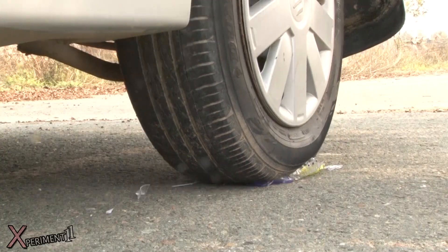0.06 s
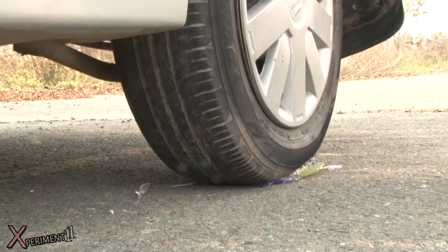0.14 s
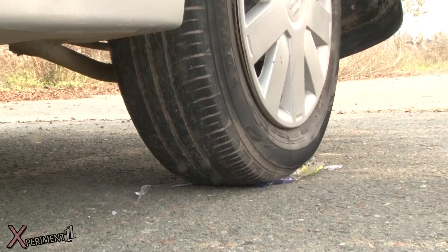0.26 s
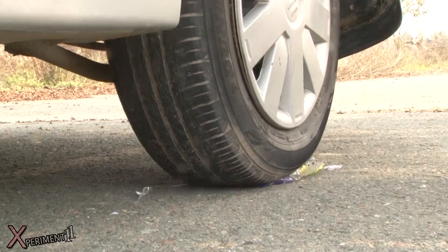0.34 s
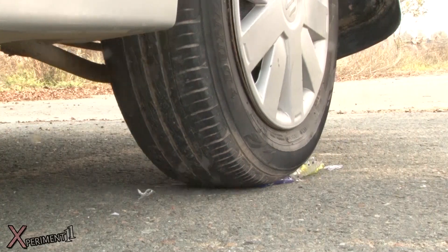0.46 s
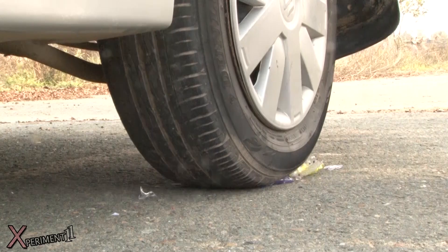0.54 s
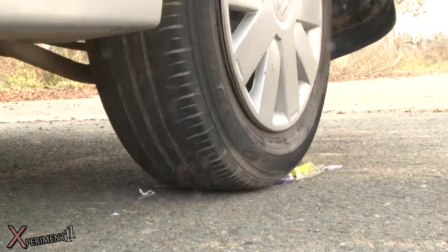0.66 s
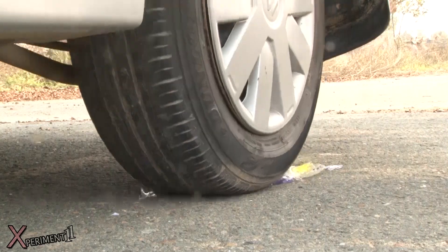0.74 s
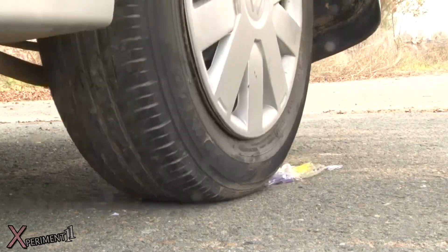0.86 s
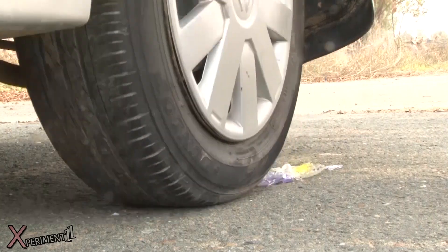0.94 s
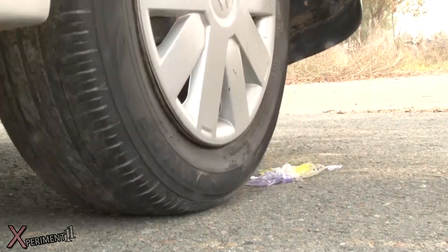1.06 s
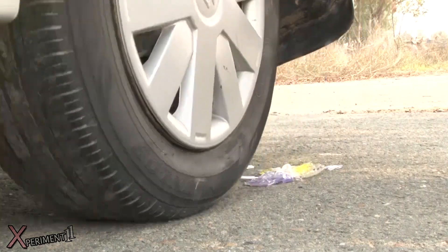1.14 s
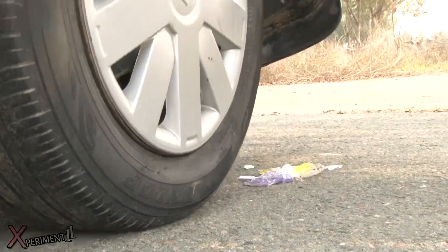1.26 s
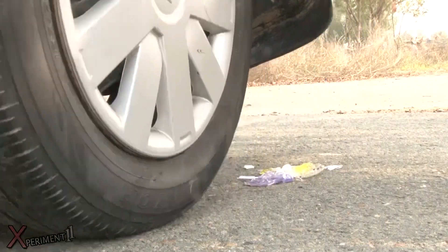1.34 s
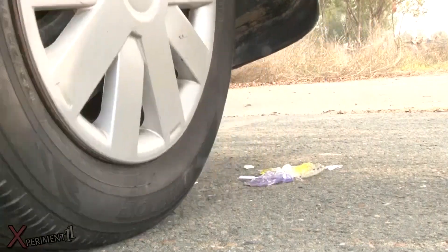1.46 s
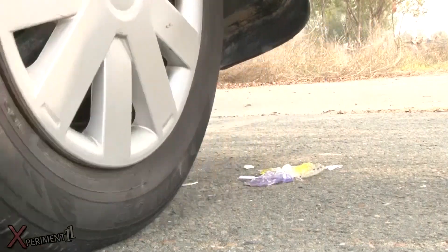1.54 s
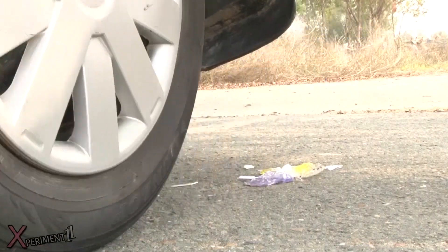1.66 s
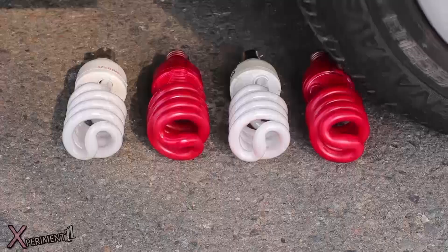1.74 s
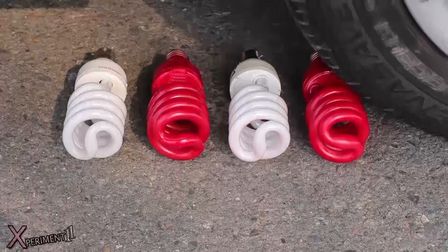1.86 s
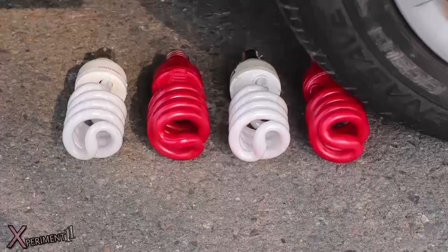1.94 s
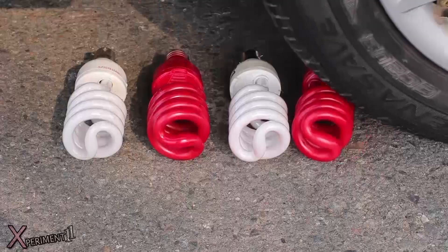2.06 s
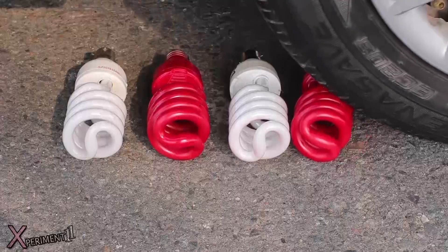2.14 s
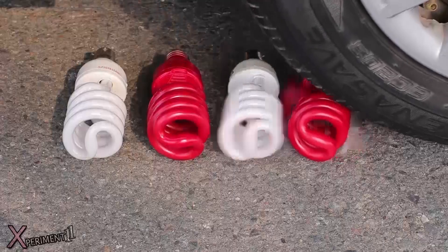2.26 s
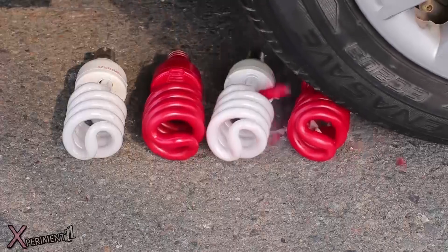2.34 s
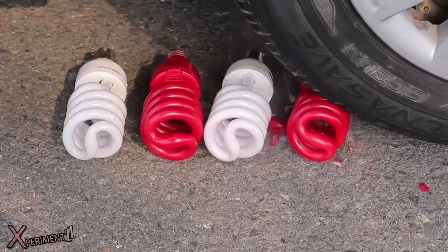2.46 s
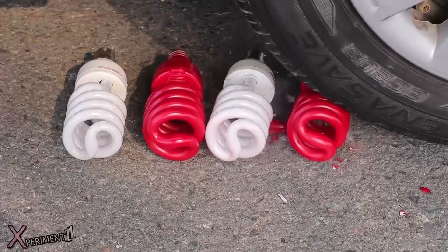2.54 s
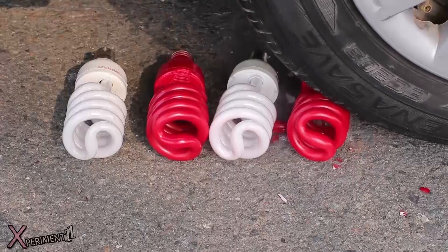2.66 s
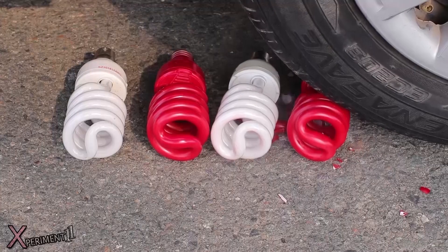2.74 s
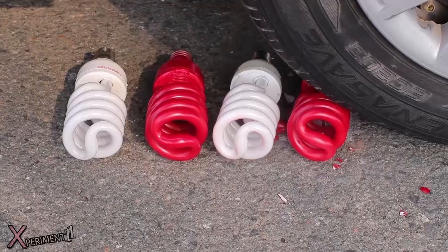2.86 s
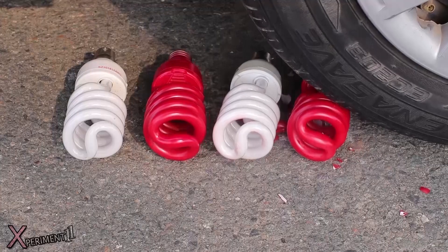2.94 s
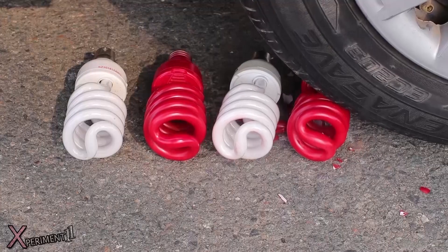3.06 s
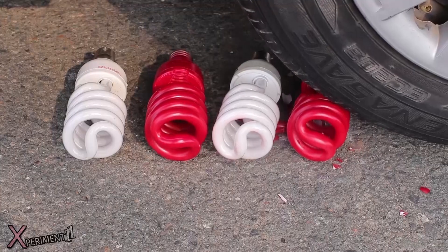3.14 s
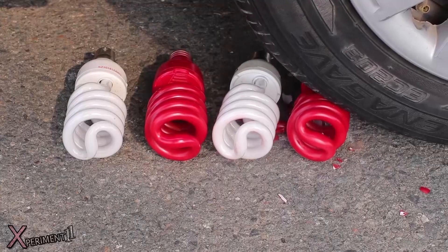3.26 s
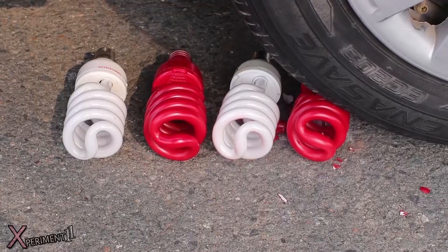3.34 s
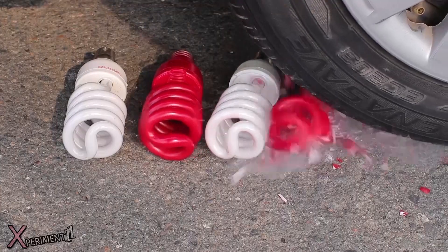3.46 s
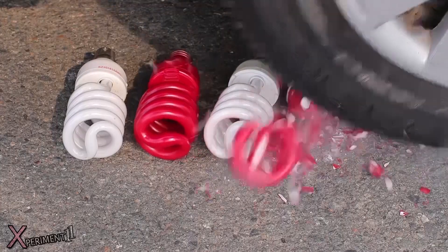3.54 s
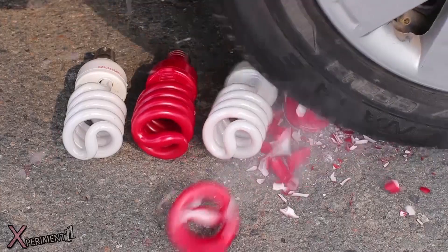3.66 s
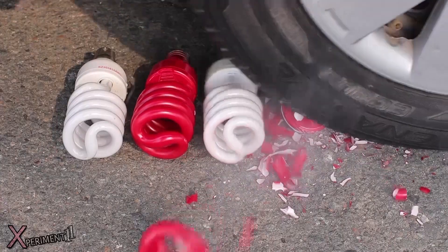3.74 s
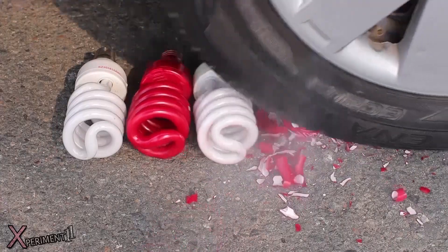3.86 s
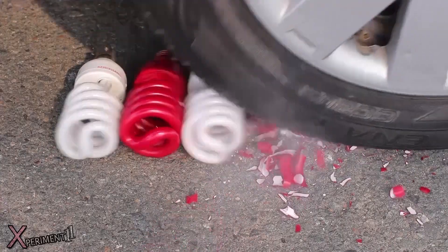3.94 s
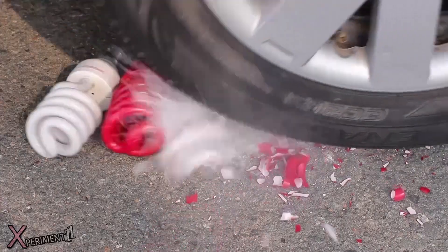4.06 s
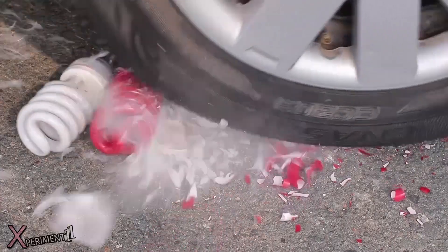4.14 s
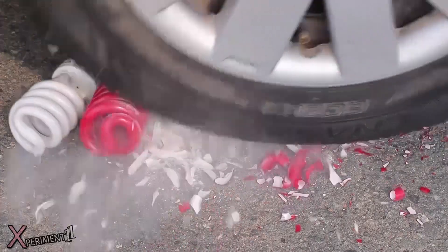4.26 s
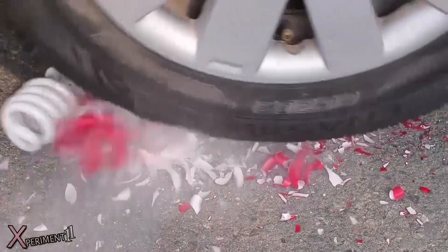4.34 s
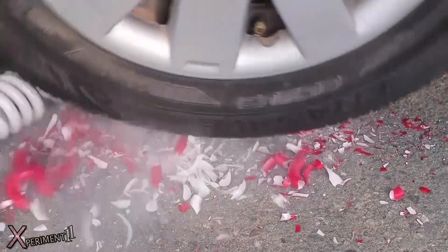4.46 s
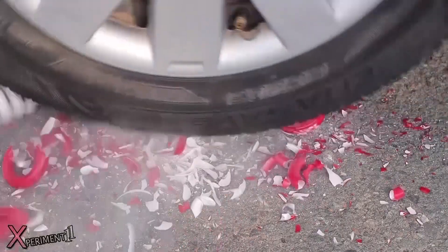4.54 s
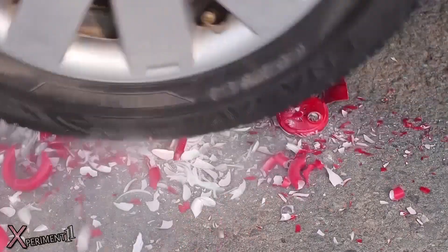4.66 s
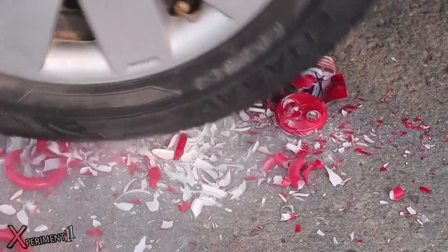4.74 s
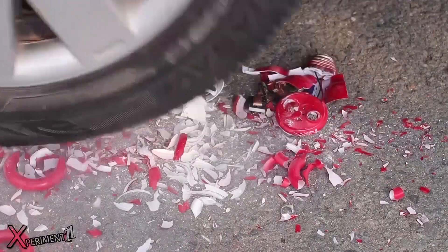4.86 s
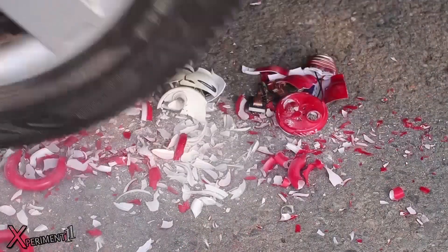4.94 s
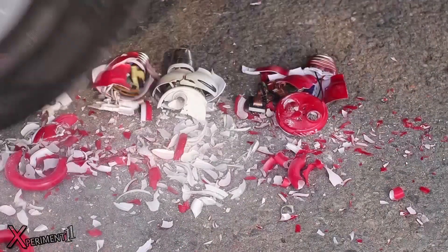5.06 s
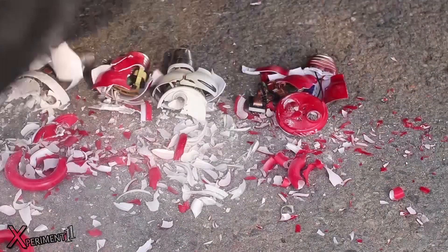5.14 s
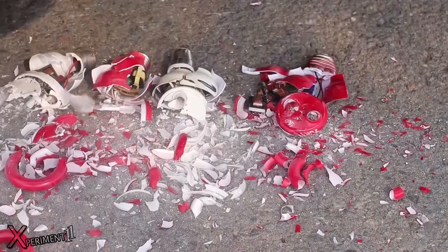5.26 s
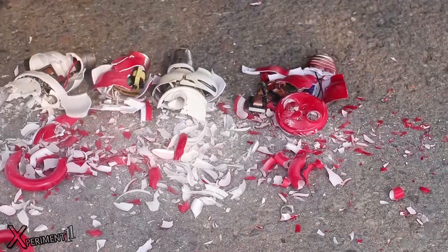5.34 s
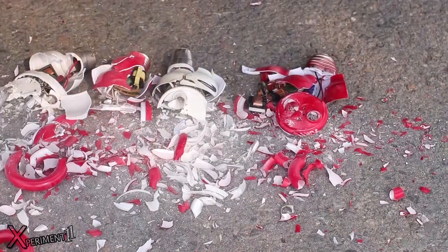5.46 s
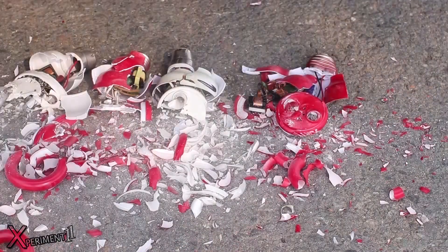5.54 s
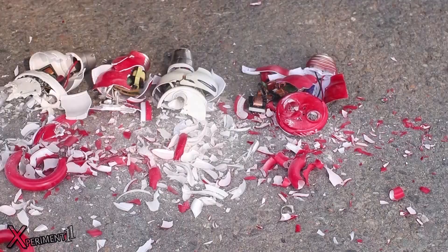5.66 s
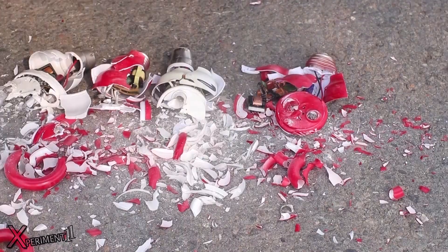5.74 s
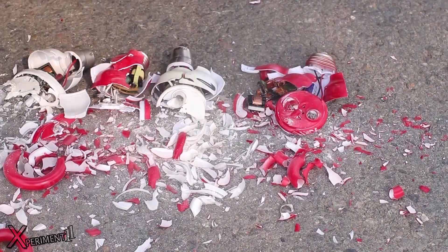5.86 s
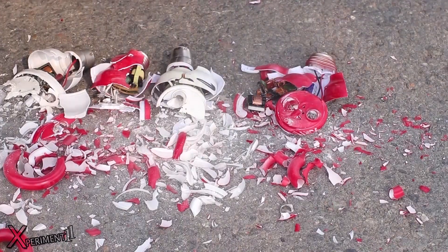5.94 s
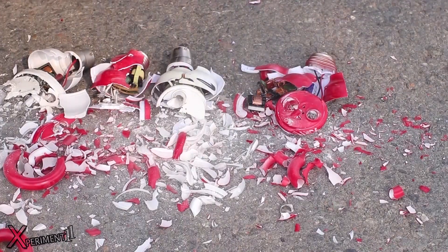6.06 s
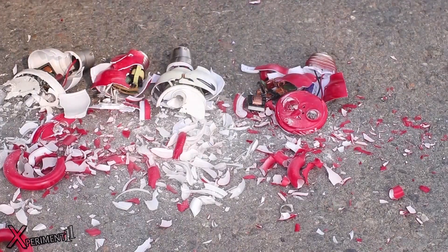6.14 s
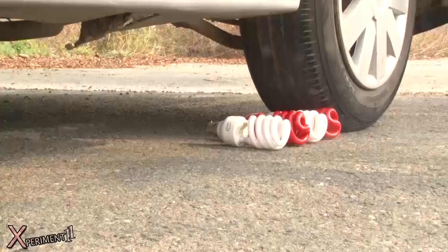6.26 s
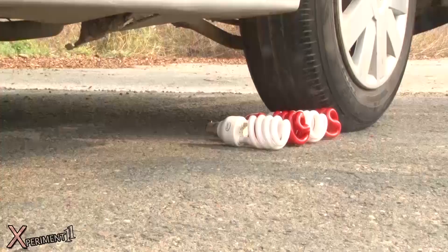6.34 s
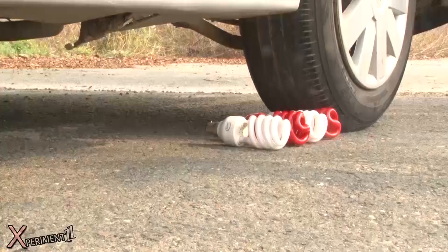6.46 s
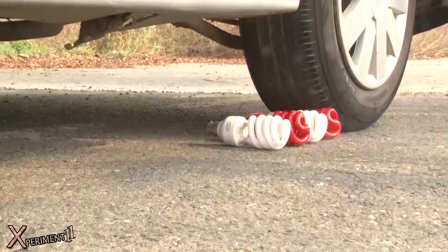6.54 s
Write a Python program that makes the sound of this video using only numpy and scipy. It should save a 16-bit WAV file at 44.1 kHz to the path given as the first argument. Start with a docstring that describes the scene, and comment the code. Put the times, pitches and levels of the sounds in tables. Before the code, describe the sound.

From 0 to 0.76 s everything sounds slowed and muffled: deep, dull glass cracks and a low thump over soft rumble. Sound then opens up: small dry snaps, ticks and bright tinkles from about 0.8 to 1.3 s, strongest near 1.05-1.1, over engine noise and low firing throb, thinning to engine alone by 1.8. Closer, a faint idle continues until one hard, loud pop at 2.36 s, with skittering shards. Engine idles quietly until 3.5 s, when lamps burst in rapid irregular succession, very loud, hollow and gritty, distorting the near microphone, each crack repeated milliseconds later by a farther one. Peaks run to about 4.65; splinters crunch and shards ring brightly. From 4.8 to 5.4 s breakage becomes duller, plasticky and weaker, with a last tick near 5.43. Faint idle remains, then at 6.3 s a louder, dull, slowed engine rumble closes.

```python
"""Glass cracks and tinkles, dull and deep at first as if slowed down, then bright and close: a tyre crushes lamps.
Each crack is a snap and a gritty noise burst that rings the hollow lamp parts; shards skid and ring
in damped sines; splinters crunch as dense clicks. An engine idles below as shaped noise, a hum and firing sines.
Up close a hot near microphone, which overloads, switches in over a farther one that hears cracks later.
The closing shot, slowed down too, is left to dull low engine noise."""
import sys
import numpy as np
from scipy import signal
from scipy.fft import rfft, irfft, next_fast_len
from scipy.io import wavfile

SR = 44100
rng = np.random.default_rng(int(sys.argv[2]) if len(sys.argv) > 2 else 0)


def file_out(sig):
    """Save sig as 16-bit WAV at sys.argv[1]."""
    # one column per channel
    cols = np.atleast_2d(sig).T
    # limit, then scale
    lim = np.clip(cols, -1, 1)
    pcm = np.round(lim * 32767).astype(np.int16)
    wavfile.write(sys.argv[1], SR, pcm)


N = 290802

# Cracks of the glass: t/s, relative treble peak level/dB, relative body level over treble/dB
CRACKS = [(0.0205, -20, -12.5), (0.177, -7.5, -26.5), (0.2728, -14, 3), (0.413, -28.5, -25),
          (0.625, -26.5, -5), (0.7845, -22.5, -21), (0.82, -14.5, -36), (0.843, -9.5, -45),
          (0.8638, -21.5, -5.5), (0.9521, -21.5, -21), (0.968, -23, -10.5), (1.046, -8.5, -20),
          (1.09, -23, -35), (1.106, -5.5, -10.5), (1.281, -30, -18), (1.3273, -26, -33), (2.359, 1, -3.5),
          (3.524, -0.5, -9), (3.6302, 2, -7.5), (3.768, 0, -13), (3.8614, -12, -40), (3.9336, 0.5, -8.5),
          (4.0038, -21, -16.5), (4.03, -7, -7), (4.0672, -2, -8), (4.136, -10.5, -20.5), (4.156, -1.5, -5),
          (4.224, -5, -10.5), (4.283, -8.5, -6.5), (4.3104, -12, -11), (4.3205, -6, -7.5),
          (4.352, -2.5, -6), (4.4391, 0.5, 4.5), (4.478, -21, -29), (4.5423, -1.5, -8.5),
          (4.5724, -9.5, -3), (4.6488, 2.5, -6), (4.6888, -6.5, 3), (4.7085, -12, -12), (4.7177, -13, 2.5),
          (4.8137, -18, 4), (4.8755, -6.5, 4), (4.915, -29.5, 16.5), (4.974, -16, -10), (5.014, -7, -3),
          (5.058, -15, -0.5), (5.0678, -10, 1.5), (5.0814, -7.5, -18), (5.117, -16, -5),
          (5.1732, -15, -2.5), (5.228, -13, -29), (5.2852, -10.5, -9), (5.4302, -9, -52)]
# Spans with the near microphone switched in: from t/s, to t/s
NEAR_SPANS = [(2.325, 2.487), (3.445, 5.53)]
# Fracture noise spectrum: f/Hz, relative density level/dB
FRACTURE_SPECTRUM = [(250, -28), (710, -18), (1200, -7), (4800, -7.5), (7330, -4.5), (16000, -17)]
# Hollow lamp base and tubes at pitch ratio 1: f/Hz, relative level/dB, t60/s
HOLLOW_MODES = [(280, -22, 0.049), (530, -1.5, 0.018), (773, 17, 0.0084), (1218, 18.5, 0.0081)]
# Treble of the breaking material, lower late on as duller plastic bases break: t/s, level/dB
TREBLE_OF_BREAKAGE = [(1.0, -3), (2.36, -6), (4.8, -2), (5.2, -13)]
# Ringing shards: t60/s at 5 kHz, modes (f/Hz, relative level/dB), touches on the road (t/s, relative level/dB)
SHARDS = [ (0.15, [(800, -9), (1480, 2.5), (1560, 0), (2030, -4), (2520, -5), (3520, -20.5)],
          [(.181, -26.5), (.195, -33), (.22, -33), (.735, -53)]), (0.087, [(3200, -9), (4330, -7),
          (5820, -1), (7000, -8), (8350, -6), (10300, 1.5)], [(.786, -28.5), (.798, -21.5)]),
          (0.087, [(5820, -9), (7250, -0.5), (9600, -2), (10300, 3)], [(.865, -30.5), (.987, -22.5),
          (1.163, -36)]), (0.094, [(5179, -14), (5780, -8), (7375, 0.5), (8468, -1), (9345, -16),
          (12200, -11)], [(1.326, -28), (1.373, -38), (1.518, -42)]), (0.19, [(2789, -16.5), (4940, -8),
          (7208, -1.5), (9625, -7), (10960, -14), (11460, -10), (14170, -17)], [(2.392, -25.5), (2.41, -22),
          (2.452, -28), (2.548, -44)]), (0.33, [(1490, -9), (2336, -2), (2541, -8), (3198, 0), (3716, 4),
          (5395, -4), (5900, -2), (8555, -5), (8865, -4), (9985, -2), (12050, -7)], [(3.544, -25),
          (3.675, -32), (3.72, -28.5), (3.751, -28)]), (0.34, [(7222, -0.5), (9306, -7.5), (12040, -20)],
          [(4.16, -16), (4.61, -24.5), (4.655, -21), (4.72, -31), (4.788, -24), (4.94, -38)]),
          (0.38, [(2110, -8), (3300, -11.5), (4360, -5.5), (4560, -3.5)], [(4.195, -38.5), (4.51, -42),
          (4.61, -33.5), (4.72, -26), (4.757, -26), (4.94, -31), (5.09, -32)]), (0.4, [(9050, -4),
          (10350, -4), (11500, -7.5), (13600, -5.5)], [(4.445, -31), (4.87, -38), (4.957, -38),
          (5.15, -34)]), ]
# Splinters under the tyre, one list per stretch: t/s, relative level/dB
CRUNCH_LEVELS = [
    [(.13, -49), (.2, -29), (.3, -45), (.45, -46), (.7, -86), (1.0, -38.5), (1.25, -53.5), (1.55, -75)],
    [(2.33, -31.5), (2.6, -56.5)],
    [(3.45, -57), (3.69, -43), (4.05, -30), (4.62, -36), (4.72, -31), (4.93, -29), (5.08, -22.5),
     (5.3, -37), (5.55, -55)],
]
# Engine noise in each shot. Levels: t/s, level/dB. Spectra: f/Hz, relative density level/dB
SLOW_START_LEVEL = [(0, -37.5), (.762, -33.5)]
SLOW_START_SPECTRUM = [(20, 3.5), (59, -6), (300, -7), (1000, -21), (2010, -22.5), (3700, -42.5),
                       (4300, -56), (5000, -110)]
SIDE_LEVEL = [(.764, -39), (1.8, -36.5)]
SIDE_SPECTRUM = [(20, -19), (100, -6), (377, -13.5), (1600, -18), (2670, -26.5), (7000, -34), (12400, -39),
                 (16000, -52)]
CLOSE_LEVEL = [(1.805, -40.5), (3.2, -43), (5.55, -47.5), (6.32, -48)]
CLOSE_SPECTRUM = [(20, -6.5), (45, -16.5), (210, -7.5), (330, -18), (620, -16.5), (1060, -19),
                  (1600, -11.5), (2000, -21.5), (3500, -27), (3850, -33), (6900, -30), (16000, -60)]
NEAR_ENGINE_LEVEL = [(2.33, -24.5), (2.49, -43.5), (3.45, -25), (3.52, -25.5), (3.6, -38.5), (4.4, -32),
                     (4.8, -37), (5.0, -57), (5.53, -49)]
NEAR_ENGINE_SPECTRUM = [(20, -8), (200, 1), (485, -12.5), (1190, -11), (2750, -23.5), (16000, -37.5)]
SLOW_END_LEVEL = [(6.325, -26), (6.59, -26)]
SLOW_END_SPECTRUM = [(20, -2.5), (223, -12), (636, -26), (2060, -36.5), (2650, -46), (2950, -94)]
# Engine bay resonances: f/Hz, width f/Hz, boost level/dB
ENGINE_BAY = [(877, 75, 12.5), (1730, 15, 12), (2273, 87, 10.5), (3200, 440, 8), (4430, 580, 12)]
# Steady engine hum: t/s, level/dB
HUM_LEVEL = [(.77, -49.5), (1.8, -39), (1.81, -56), (4.6, -44.5), (4.75, -30.5), (5.54, -52), (6.32, -51.5)]
# Engine firing: t/s, firing rate f/Hz, level/dB before the order levels
FIRING = [(.77, 39.8, -26.5), (1.3, 29.23, -46), (1.8, 28.94, -33), (1.81, 41.3, -42), (3.44, 39.1, -45.5),
          (3.6, 36.6, -38), (5.5, 29.7, -55), (6.32, 27, -41.5)]
# Multiples 1, 2, 3 of the firing rate: relative level/dB
FIRING_ORDERS_DB = [-4.5, -15.5, -11.5]
# Left-right likeness of noise: f/Hz, likeness (1 = same on both sides)
LIKENESS = [(60, 0.9), (400, 0.42), (2500, 0.43), (7000, 0.58), (14000, 0.17)]

CRACK_T60_S, TICK_T60_S = 0.095, 0.04
TICK_BELOW_DB = -30   # cracks with less body than this are mere ticks
CRACK_SPREAD_DB = 1.6   # cracks fall left and right of the microphones
SLOWED_PITCH_RATIO = 0.34   # hollow parts in the slowed first shot
SIZE_SPREAD_OCTAVES = 0.2   # hollow parts elsewhere differ in size
FAR_DB = -4.5   # far microphone against the near one
FAR_LOSS_PER_BODY_DB = 0.367   # cracks with much body are under the rubber, hidden from the far microphone
FAR_T60_SHARE = 0.45
FAR_LAG_S = 0.018
# Once the wheel rolls away, the far lag grows and the far level drops
ROLLS_FROM_S, LAG_GROWTH_S_PER_S, FAR_FADE_DB_PER_S = 4.5, 0.0026, 3
SKID_T60_S = 0.051   # a touch is a short rough skid
# Chips fly with a shard: fainter, shorter modes, struck unevenly
CHIP_DB, CHIP_SPREAD_DB, CHIP_T60_SHARE = -16, 8, 0.56
SPLINTERS_PER_S = 800   # on average
HUM_HZ = 249.4
SLOW_STOP_HZ, TOP_STOP_HZ = 4370, 16300   # low-pass stopband edges


def cracks(rows, snap_db, body_db):
    """Each crack is a snap and a dying, gritty burst of fracture noise, which also rings the hollow parts."""
    size = SR // 5
    t = np.arange(size) / SR
    out = np.zeros((2, N + SR))
    hiss = glassy(noise(FRACTURE_SPECTRUM))
    click = ring(t == 0, 2080, 0.0023)   # the first give of the wall
    shakes = rng.standard_normal((len(rows), size))
    steps = rng.standard_normal((len(rows), 150))   # the fracture runs on in jerks of a millisecond or so
    sides = amp(CRACK_SPREAD_DB * rng.standard_normal((len(rows), 1, 1)) * [[1], [-1]])
    for (s, peak_db, rel_db, t60, pitch), shake, jerks, side in zip(rows, shakes, steps, sides):
        jerk_curve = np.interp(t * 700, np.arange(150), jerks)
        grit = amp(3.3 * np.maximum(jerk_curve, 1 - t * 500))   # the first jerk is never weak
        snap = amp(snap_db - 60 * t / 0.0066)
        burst = amp(-60 * t / t60) * grit + snap
        body = hollow(shake * burst, pitch)
        body = body / np.max(np.abs(body)) * amp(rel_db + body_db)
        body = body * amp([[-.7], [.7]])   # slightly louder on the right
        i = round(s * SR)
        fracture = amp(-7.0) * hiss[:, i:i + size] * burst
        out[:, i:i + size] += side * amp(peak_db) * (fracture + amp(-2.0) * click + body)
    return out[:, :N]


def crack_rows():
    """Cracks with what they ring: t/s, peak level/dB, body level/dB, t60/s, pitch ratio."""
    s, peak_db, rel_db = np.transpose(CRACKS)
    slowed = s < SLOW_START_LEVEL[-1][0]
    short = (rel_db < TICK_BELOW_DB) | (slowed & (rel_db > 0))   # slowed thumps are single blows
    t60 = np.where(short, TICK_T60_S, CRACK_T60_S)
    sizes = 2 ** rng.normal(0, SIZE_SPREAD_OCTAVES, len(s))
    pitch = np.where(slowed, SLOWED_PITCH_RATIO, sizes)
    return np.column_stack([s, peak_db, rel_db, t60, pitch])


def heard_twice():
    """Mark the cracks of the close shot, which has two microphones."""
    return np.array(CRACKS)[:, 0] > CLOSE_LEVEL[0][0]


def near_microphone(rows):
    """Loud cracks flatten softly toward the overload point; heard only while switched in."""
    t = np.arange(N) / SR
    on = sum((t > a) & (t < b) for a, b in NEAR_SPANS)
    x = cracks(rows, snap_db=-2.0, body_db=1.5) + engine(NEAR_ENGINE_LEVEL, NEAR_ENGINE_SPECTRUM)
    top = 0.5
    return on * x / (1 + np.abs(x / top) ** 4) ** (1 / 4)


def far_microphone(rows):
    """The cracks arrive later, shorter and with more body."""
    s, peak_db, rel_db, t60, pitch = rows.T
    rolling_s = np.maximum(s - ROLLS_FROM_S, 0)
    late = s + FAR_LAG_S + LAG_GROWTH_S_PER_S * rolling_s
    hidden_db = FAR_LOSS_PER_BODY_DB * np.maximum(rel_db, -20)
    far_db = peak_db + FAR_DB - hidden_db - FAR_FADE_DB_PER_S * rolling_s
    far_rows = np.transpose([late, far_db, rel_db, FAR_T60_SHARE * t60, pitch])
    return cracks(far_rows, snap_db=2.5, body_db=5.5)


def hollow(x, pitch=1):
    """The hollow parts of a lamp, rung by x; a lower pitch rings longer."""
    return sum(amp(db) * ring(x, hz * pitch, t60 / pitch) / np.sqrt(t60) for hz, db, t60 in HOLLOW_MODES)


def glassy(x):
    """Treble turned up or down with what is breaking."""
    low = signal.sosfilt(signal.butter(2, 3500, fs=SR, output="sos"), x)
    return low + amp(curve(TREBLE_OF_BREAKAGE)[0]) * (x - low)


def shards():
    """Each touch skids and shakes all modes of a shard and its chips, unevenly; high modes die sooner."""
    out, t = np.zeros((2, N + SR)), np.arange(SR // 20) / SR
    for t60, modes, touches in SHARDS:
        touch_s, touch_db = np.transpose(touches)
        at = np.round(touch_s * SR).astype(int)
        size = at[-1] - at[0] + SR // 2
        own = [(hz, db, 1.5, t60) for hz, db in modes]
        chips = [(hz, CHIP_DB, CHIP_SPREAD_DB, CHIP_T60_SHARE * t60) for hz in rng.uniform(5000, 15800, 10)]
        for hz, level_db, spread_db, rings_s in own + chips:
            uneven_db = rng.normal(0, spread_db, len(at))
            side_db = rng.normal(0, 2.2, (len(at), 2)).T
            strengths = amp(touch_db + level_db + uneven_db + side_db)
            skids = rng.standard_normal((len(at), len(t))) * amp(-60 * t / SKID_T60_S)
            skids[:, 0] = amp(17)   # the first knock
            push = np.zeros((2, size))
            for i, strength, skid in zip(at - at[0], strengths.T, skids):
                push[:, i:i + len(t)] += strength[:, None] * skid / np.linalg.norm(skid)
            # a turning shard beams unevenly
            tumble = np.interp(np.arange(size) / SR * 110, np.arange(200), rng.standard_normal(200))
            ringing = ring(push, hz, rings_s * np.sqrt(5000 / hz))
            out[:, at[0]:at[0] + size] += ringing * amp(4.1 * tumble)
    return out[:, :N]


def crunch():
    """Dense uneven splinter clicks, each a short noise puff; some tinkle, and all shake the hollow parts."""
    born = rng.random(N) < SPLINTERS_PER_S / SR
    sizes = born * amp(3.4 * np.minimum(rng.exponential(1, N), 5))
    envelope = signal.lfilter([1], [1, -amp(-60 / (0.011 * SR))], sizes)   # t60 of 11 ms
    puffs = envelope * glassy(noise(FRACTURE_SPECTRUM))
    dealt = rng.integers(0, 500, N)   # only splinters dealt one of the 40 pitches tinkle
    pitches = np.exp(rng.uniform(np.log(5000), np.log(14500), 40))
    tinkle = sum(ring(np.sqrt(sizes) * (dealt == k), hz, 700 / hz) for k, hz in enumerate(pitches))
    body = hollow(sizes * rng.standard_normal(N))
    grains = puffs / np.std(puffs) + amp(-12.5) * tinkle / np.std(tinkle) + amp(-4.0) * body / np.std(body)
    return grains * sum(amp(db) * on for db, on in map(curve, CRUNCH_LEVELS))


def engine(rows, spectrum, peaks=()):
    """Idling engine of one shot: noise shaped by a spectrum, with optional resonances."""
    level_db, on = curve(rows)
    return amp(level_db) * on * noise(spectrum, peaks)


def tone(hz, level_db, on, orders_db=(0,)):
    """Engine sines on the multiples of a turning rate."""
    turn = 2 * np.pi * np.cumsum(hz * on) / SR
    orders = sum(amp(db) * np.sin((k + 1) * turn) for k, db in enumerate(orders_db))
    return np.sqrt(2) * amp(level_db) * on * orders


def noise(spectrum, peaks=()):
    """Stereo noise of a given spectrum with resonant bumps, mixed from mid and side; rms 1."""
    size = next_fast_len(N)
    hz = np.maximum(np.arange(size // 2 + 1) * SR / size, 1)
    bumps_db = sum(db / (1 + (2 * (hz - f) / w) ** 2) for f, w, db in peaks)
    level_db = at_hz(spectrum, hz) + bumps_db
    mid, side = rfft(rng.standard_normal((2, size))) * amp(level_db)
    alike = np.clip(at_hz(LIKENESS, hz), 0, 1)
    x = irfft(np.sqrt(1 + alike) * mid + np.sqrt(1 - alike) * side * [[1], [-1]], size)[:, :N]
    return x / np.std(x)


def ring(x, hz, t60):
    """A damped resonator: a unit click sets a sine of height 1 ringing."""
    r, w = amp(-60 / (t60 * SR)), 2 * np.pi * hz / SR
    return signal.lfilter([0, np.sin(w)], [1, -2 * r * np.cos(w), r * r], x + 1e-18)


def amp(db):
    """Decibels to gain."""
    return 10 ** (np.asarray(db) / 20)


def curve(rows):
    """Columns of a table over time, and a gate that is open within its span."""
    s, *columns = np.transpose(rows)
    t = np.arange(N) / SR
    return [np.interp(t, s, c) for c in columns] + [(t >= s[0]) & (t <= s[-1])]


def at_hz(points, hz):
    """A spectrum read on a log frequency axis."""
    f, value = np.transpose(points)
    return np.interp(np.log(hz), np.log(f), value)


def scene():
    """Glass and car through all shots; slowing down leaves no treble on the first shot's glass."""
    rows, close = crack_rows(), heard_twice()
    glass = cracks(rows[~close], snap_db=-7.5, body_db=8.5) + shards() + crunch()
    slowed = signal.sosfilt(signal.cheby2(10, 60, SLOW_STOP_HZ, fs=SR, output="sos"), glass)
    glass = np.where(curve(SLOW_START_LEVEL)[-1], slowed, glass)
    car = engine(SLOW_START_LEVEL, SLOW_START_SPECTRUM) + engine(SIDE_LEVEL, SIDE_SPECTRUM)
    car = car + engine(CLOSE_LEVEL, CLOSE_SPECTRUM, ENGINE_BAY) + engine(SLOW_END_LEVEL, SLOW_END_SPECTRUM)
    car = car + tone(HUM_HZ, *curve(HUM_LEVEL)) + tone(*curve(FIRING), FIRING_ORDERS_DB)
    return glass + car + near_microphone(rows[close]) + far_microphone(rows[close])


def record(dry):
    """The mix clips at full scale, then the top is cut and stray peaks clip again."""
    clipped = np.clip(dry, -1, 1)
    low_pass = signal.cheby2(20, 70, TOP_STOP_HZ, fs=SR, output="sos")
    return np.clip(signal.sosfilt(low_pass, clipped), -1, 1)


dry = scene()
out = record(dry)
file_out(out)
```